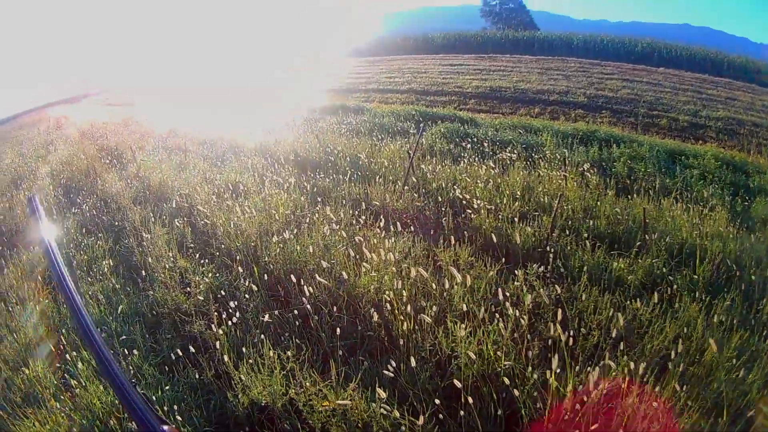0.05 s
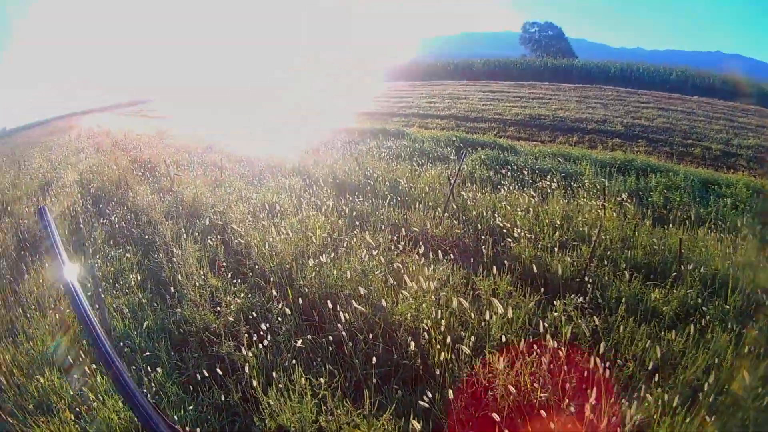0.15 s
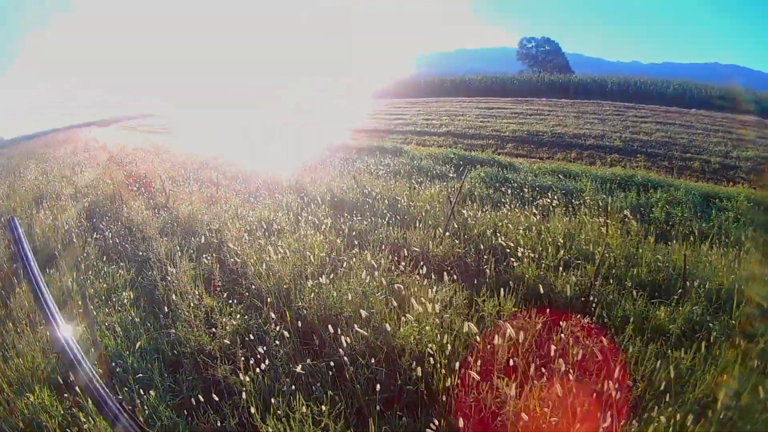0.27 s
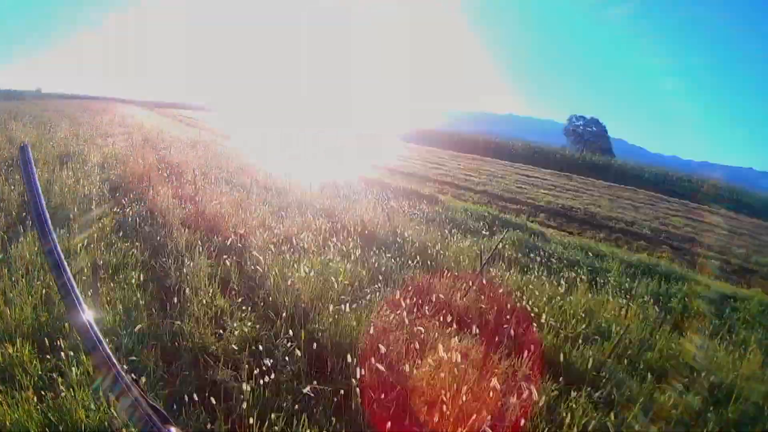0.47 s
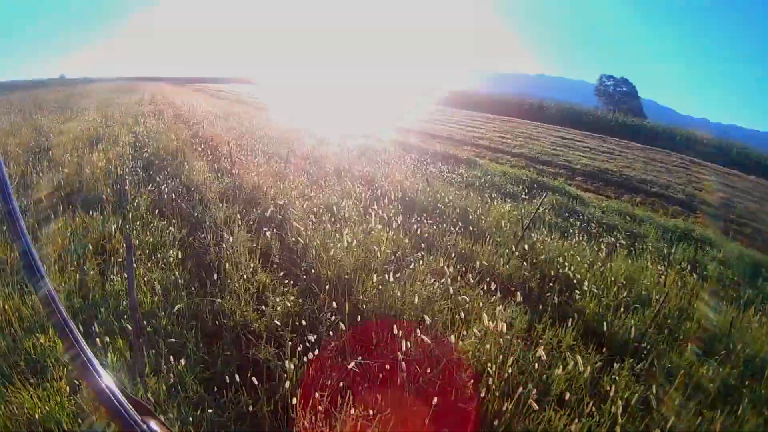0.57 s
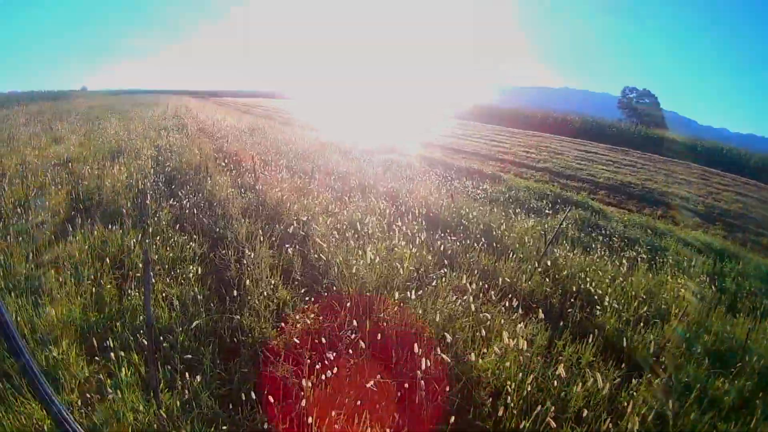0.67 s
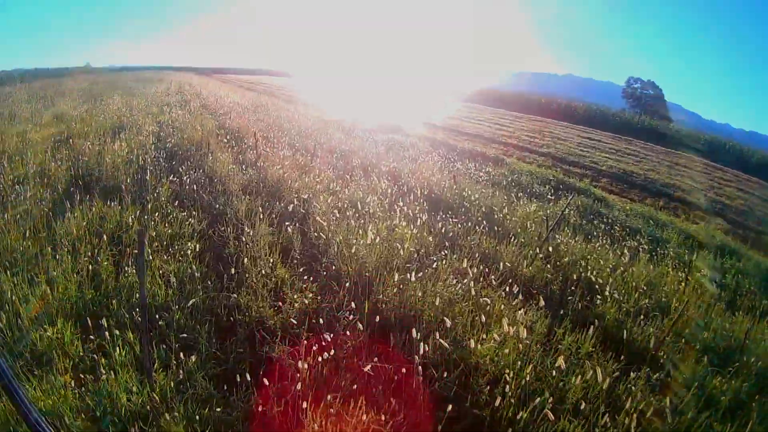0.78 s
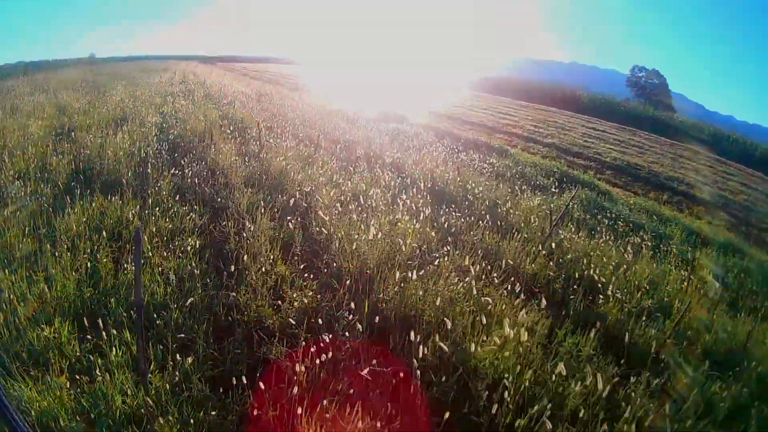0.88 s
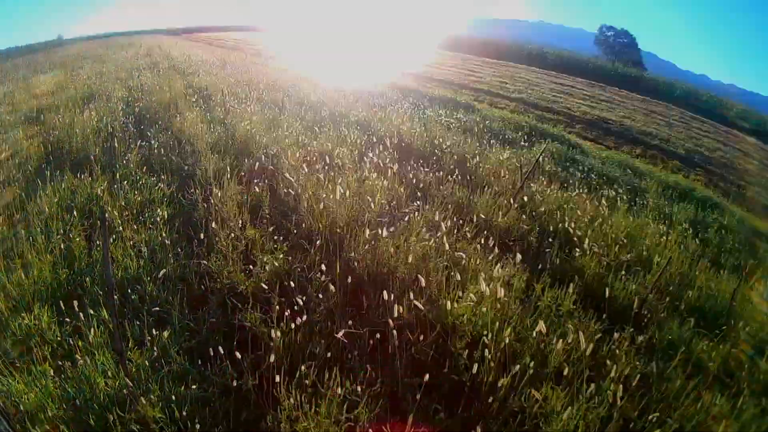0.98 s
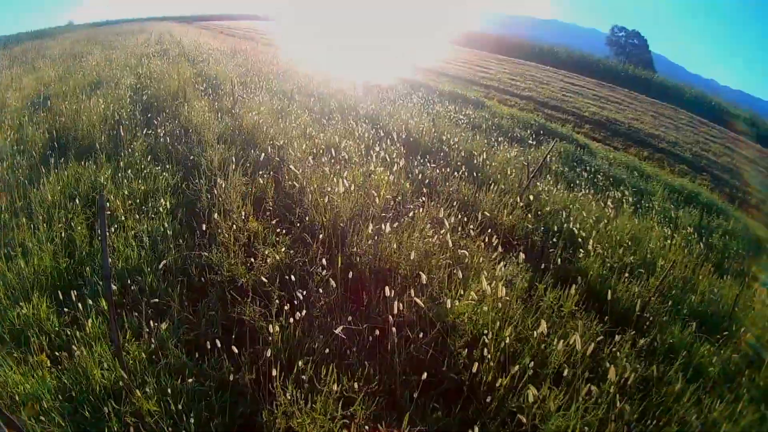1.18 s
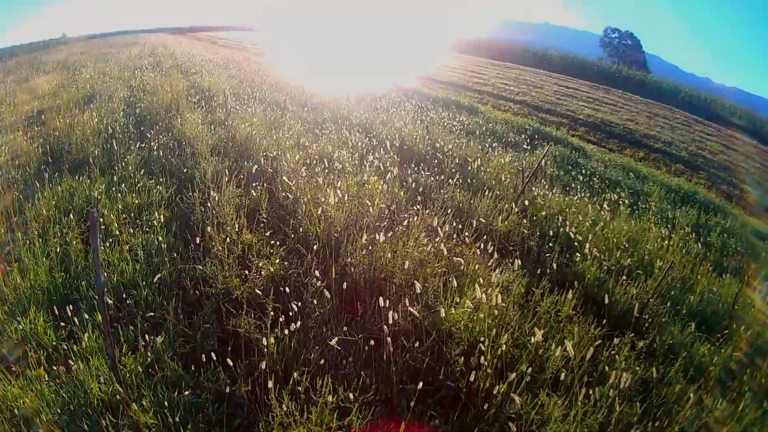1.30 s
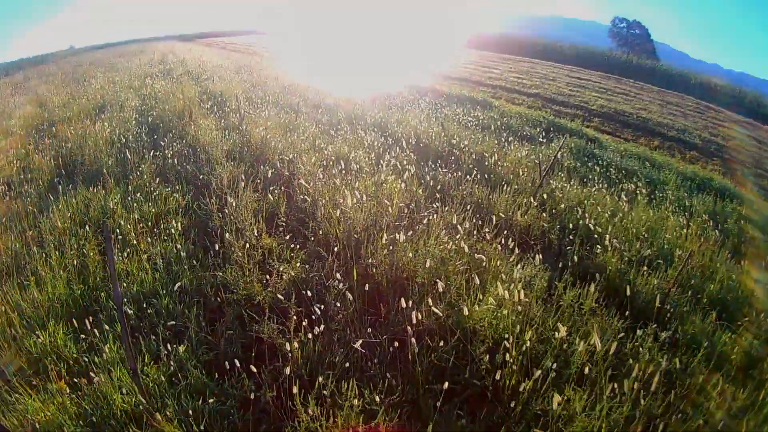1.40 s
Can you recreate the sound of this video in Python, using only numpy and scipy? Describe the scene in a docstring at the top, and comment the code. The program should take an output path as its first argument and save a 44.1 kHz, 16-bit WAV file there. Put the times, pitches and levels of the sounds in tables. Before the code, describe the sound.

A camera mount knocks and thumps unevenly while tall grass rustles in light wind.

```python
"""A camera carried through tall meadow grass, heard close and dry on its own microphone.
From the start the grass rustles in swells and a light wind rumbles on the microphone.
A quarter second in, the mount takes one hard jolt, rings and thuds. It then knocks irregularly
with the steps, heavily again near 0.9 s, while stalks flick against the casing and brush along it."""
import sys
import numpy as np
from scipy.fft import rfft, irfft, next_fast_len
from scipy.io import wavfile
from scipy.ndimage import map_coordinates

SR = 44100
rng = np.random.default_rng(int(sys.argv[2]) if len(sys.argv) > 2 else 0)


def digitize_waveform(pressure):
    """Quantize a signal to 16-bit integers and store it at the path in sys.argv[1].

    Rows of a 2-D input are taken as channels; values are limited to [-1, 1].
    """
    field = np.atleast_2d(pressure).T
    bounded = np.clip(field, -1, 1)
    quanta = np.round(bounded * 32767).astype(np.int16)
    wavfile.write(sys.argv[1], SR, quanta)


N = 63945
T = np.arange(N) / SR


def knocks():
    """Right at the microphone, each contact rings the mount in its own colour and shakes loose parts."""
    # contacts (time [s], gain [dB], colour centre [Hz], colour width [octaves], relative clatter [dB])
    contacts = [(0.2045, -22, 1715, 0.91, -16), (0.2429, 0.5, 690, 4.2, -24.5),
                (0.2596, -18.5, 900, 0.51, -6), (0.3988, -30.5, 970, 0.36, -35),
                (0.4843, -15.5, 2200, 0.86, -30), (.5250, -20, 1000, 0.15, -21),
                (0.7332, -17.5, 412, 0.37, -25), (.7545, -16.5, 360, 0.51, -22),
                (0.7568, -21, 1520, 0.58, -15.5), (0.9064, -7.5, 1710, 0.41, -24.5),
                (.9080, -13, 330, 0.86, -21), (0.9326, -9.5, 270, 0.73, -30),
                (1.0010, -35.5, 2000, 1.96, -4.5), (1.0243, -18.5, 1080, 0.36, -39),
                (1.0375, -22.5, 1580, 0.54, -17.5), (1.1045, -20.5, 994, 0.18, -16),
                (1.1562, -22, 1610, 0.57, -27), (1.413, -28, 1890, .8, -28)]
    # modes of the mount and casing (frequency [Hz], gain [dB], t60 [s])
    modes = [(215, -20.5, .022), (410.7, -13, 0.036), (632.7, 1.5, 0.015), (715, -3.5, 0.016),
             (836, -13.5, 0.027), (910, -14.5, 0.023), (1145, -17.5, 0.016), (1231.5, -21.5, 0.045),
             (1443, -18, 0.02), (1634, -20.5, 0.024), (2077, -19, 0.018), (2577, -30.5, 0.024),
             (3840, -39.5, .018), (4670, -45, .018)]
    # spectrum of the loose parts (frequency [Hz], level [dB])
    clatter_spectrum = [(60, -11), (200, -14), (300, -14), (450, -2), (750, -9.5), (1300, -15.5),
                        (1800, -18.5), (2700, -33), (4000, -54.5), (8000, -72.5)]
    scatter_db = 5.15  # no two knocks excite the modes alike
    out = np.zeros(N)
    for s, db, centre_hz, octaves, clatter_db in contacts:
        colour = bell(centre_hz, octaves)
        for k, (hz, mode_db, t60) in enumerate(modes):
            polarity = (-1) ** (k // 3 + 1)
            gain = amp(db + mode_db + scatter_db * rng.standard_normal()) * colour(hz)
            ring = strike(s, attack=0.00076, t60=t60) * np.sin(2 * np.pi * hz * (T - s))
            out += polarity * gain * ring
        clatter = strike(s, attack=0.0014, t60=0.14) * noise(clatter_spectrum, colour)
        out += amp(db + clatter_db) * clatter
    return out


def thuds():
    """On the heavier jolts the whole camera sways for a few cycles on its mount."""
    # low thuds (time [s], gain [dB], pitch [Hz])
    jolts = [(0.187, -29, 65.2), (0.242, -14, 64), (0.766, -34.5, 152.5), (0.9065, -22.5, 118),
             (0.931, -25.5, 135)]
    return sum(amp(db) * strike(s, attack=0.0051, t60=0.053) * np.sin(2 * np.pi * hz * (T - s))
               for s, db, hz in jolts)


def flicks():
    """Stalks hit the casing beside the microphone with dry ticks."""
    # stalk hits (time [s], gain [dB], colour centre [Hz], colour width [octaves])
    hits = [(0.2059, -29, 3300, 0.59), (0.359, -29, 3400, 0.57), (0.482, -35.5, 2770, 0.17),
            (0.5241, -32.5, 4780, 0.79), (0.5493, -46, 4450, 0.88), (.6380, -53.5, 5400, 0.58),
            (0.7306, -35.5, 2130, 0.64), (0.758, -36, 6070, 0.45), (0.7713, -34, 2620, 0.33),
            (.7770, -48, 5500, 0.42), (.8450, -48.5, 5800, 0.47), (0.8645, -44, 4500, 1),
            (0.9061, -24, 4960, 1.4), (0.9318, -37, 2730, 0.33), (1.0020, -34.5, 2720, 0.67),
            (1.1035, -35.5, 4360, 0.59), (1.1179, -43, 3500, 0.58), (1.2936, -54.5, 4960, 0.17),
            (1.4138, -39, 3450, 0.92)]
    # spectrum of a tick before its colour (frequency [Hz], level [dB])
    tick_spectrum = [(600, -24.5), (1500, 29), (2700, -3.5), (3900, 6), (4700, -9.5), (5700, -5),
                     (7100, -10), (8000, -29.5), (9700, -10), (12500, -27), (15000, -36)]
    out = np.zeros(N)
    for s, db, centre_hz, octaves in hits:
        tick = unit(noise(tick_spectrum, bell(centre_hz, octaves)))
        out += amp(db) * strike(s, attack=0.00036, t60=0.01) * tick
    return out


def grass():
    """The grass close by gives a dull rustle and a fine swish, grainy from many small contacts."""
    # swells of the moving grass (time [s], rustle level [dB], swish level [dB])
    swells = [(0, -50, -62), (.13, -54, -73), (.2, -49, -60.5), (.235, -49, -64.5), (.29, -44.5, -74.5),
              (.36, -42.5, -73), (.44, -44, -62.5), (.51, -48, -61), (.58, -50.5, -69), (.71, -53.5, -69),
              (.775, -49, -57), (.825, -51.5, -64.5), (.9, -47.5, -53), (.97, -49.5, -62),
              (1.04, -56.5, -62.5), (1.09, -55.5, -65), (1.2, -53.5, -69), (1.33, -57, -71.5),
              (1.39, -49, -68), (1.45, -59, -80)]
    # spectrum of the dull rustle (frequency [Hz], level [dB])
    rustle_spectrum = [(80, -16.5), (200, -4), (300, -4), (420, -3), (750, -1.5), (1000, -5), (1400, -6.5),
                       (1900, -13.5), (2800, -28), (4500, -35.5), (9000, -60)]
    # spectrum of the treble swish (frequency [Hz], level [dB])
    swish_spectrum = [(1000, 3), (2500, 1.5), (3600, 0), (4800, -7), (6500, -6), (7300, -14), (8000, -24.5),
                      (9500, -14.5), (12000, -27), (15000, -24.5)]
    rustle_grain_db, swish_grain_db = 1.54, 3.5
    rustle_db, swish_db = curves(swells)
    rustle = unit(noise(rustle_spectrum) * amp(rustle_grain_db * wobble(rate=170)))
    swish = unit(noise(swish_spectrum) * amp(swish_grain_db * wobble(rate=320)))
    return amp(rustle_db) * rustle + amp(swish_db) * swish


def rubbing():
    """Stalks slide along the casing: a thin, noisy resonance comes and goes, with two weaker ones."""
    # main resonance of the rubbed casing (time [s], pitch [Hz], level [dB])
    strokes = [(0, 1425, -57.5), (.07, 1452, -48.5), (.13, 1411, -59.5), (.19, 1420, -45.5),
               (.24, 1419, -63.5), (.35, 1296, -45), (.42, 1320, -59), (.8, 1401, -94), (.895, 1400, -40.5),
               (.96, 1420, -59), (1.15, 1400, -80), (1.2, 1430, -54), (1.245, 1420, -77),
               (1.272, 1389, -53), (1.325, 1408, -71), (1.41, 1400, -55.5), (1.45, 1390, -65)]
    # steady-pitched side resonances (frequency [Hz], width [Hz], relative level [dB])
    resonances = [(430, 150, -4), (3580, 450, -19)]
    hz, db = curves(strokes)
    main = narrow_noise(2 * np.pi * np.cumsum(hz) / SR, width_hz=230)
    sides = sum(amp(side_db) * narrow_noise(2 * np.pi * side_hz * T, width_hz)
                for side_hz, width_hz, side_db in resonances)
    return amp(db) * (main + sides)


def wind():
    """Light wind buffets the microphone."""
    # gusts (time [s], level [dB])
    gusts = [(0, -59), (.15, -58), (.19, -55), (.23, -64), (.37, -52), (.47, -57.5), (.54, -48.5),
             (.65, -54), (.73, -58), (.95, -50.5), (1.1, -55.5), (1.3, -60.5), (1.45, -51.5)]
    # spectrum of the rumble (frequency [Hz], level [dB])
    rumble_spectrum = [(10, -16), (25, 6), (55, 1), (100, -4), (200, -21.5), (500, -53)]
    db, = curves(gusts)
    return amp(db) * noise(rumble_spectrum)


def amp(db):
    """Decibels to gain."""
    return 10 ** (np.asarray(db) / 20)


def unit(x):
    """Scale to rms 1."""
    return x / np.sqrt(np.mean(x ** 2) + 1e-20)


def curves(rows):
    """One value per sample for each column after the time."""
    s, *columns = np.transpose(rows)
    return [np.interp(T, s, column) for column in columns]


def wobble(rate):
    """A smooth random curve, rate knots a second."""
    return map_coordinates(rng.standard_normal(int(N * rate / SR) + 4), [T * rate])


def filtered(x, response):
    """Filter x by a gain given as a function of frequency."""
    size = next_fast_len(N + SR // 2)
    return irfft(rfft(x, size) * response(np.fft.rfftfreq(size, 1 / SR)), size)[:N]


def noise(spectrum, colour=np.ones_like):
    """Noise of rms 1 with a (frequency [Hz], level [dB]) spectrum, then an optional colour."""
    points_hz, db = np.transpose(spectrum)
    response = lambda hz: amp(np.interp(np.log(hz + 1), np.log(points_hz + 1), db))
    shaped = unit(filtered(rng.standard_normal(N), response))
    return filtered(shaped, colour)


def narrow_noise(phase, width_hz):
    """A narrow band of noise, rms 1, around a carrier of the given phase."""
    return unit(wobble(width_hz) * np.sin(phase) + wobble(width_hz) * np.cos(phase))


def bell(centre_hz, octaves):
    """A colour: a bell-shaped gain on a log-frequency axis."""
    return lambda hz: np.exp(-.5 * (np.log2((hz + 1) / centre_hz) / octaves) ** 2)


def strike(s, attack, t60):
    """Envelope of a blow at s: quick rise, exponential fall; all times in seconds."""
    age = np.maximum(T - s, 0)
    return (1 - np.exp(-age / attack)) * np.exp(-np.log(1000) * age / t60)


def scene():
    """An open field in mono: everything is close to the microphone, with no echo."""
    return (knocks() + thuds() + flicks() + grass() + rubbing() + wind())[None]


def record(dry):
    """The camera rounds off the hardest peak, adds faint hiss and keeps nothing above its band limit."""
    ceiling, hiss_db, top_hz = 0.94, -79, 15600
    rounded = dry[0] / (1 + (dry[0] / ceiling) ** 4) ** .25
    hiss = amp(hiss_db) * rng.standard_normal(N)
    return filtered(rounded + hiss, lambda hz: hz < top_hz)[None]


dry = scene()
out = record(dry)
digitize_waveform(out)
```